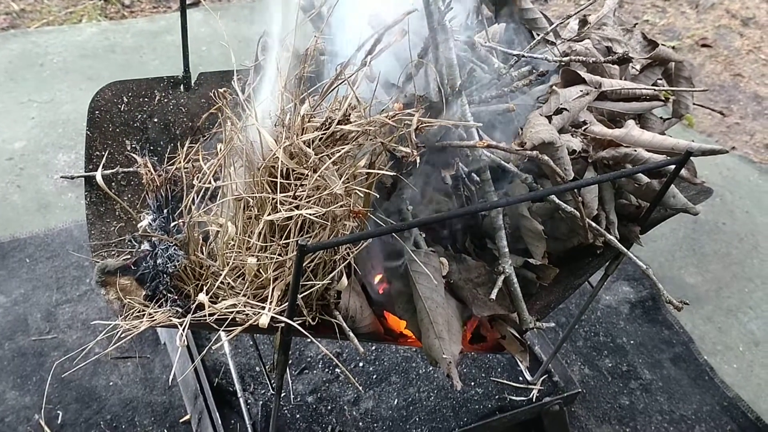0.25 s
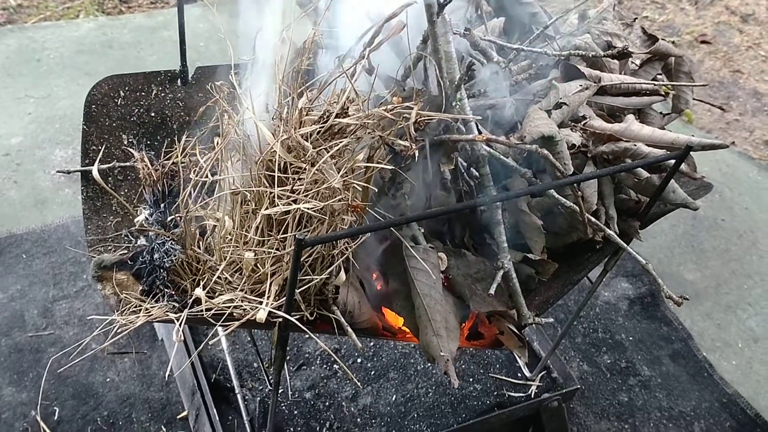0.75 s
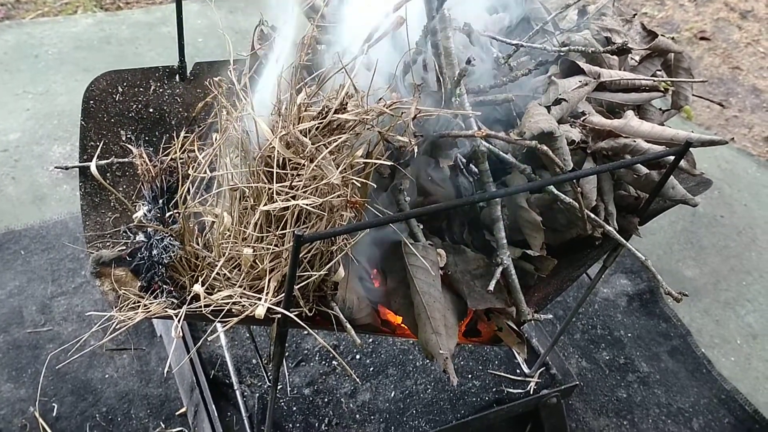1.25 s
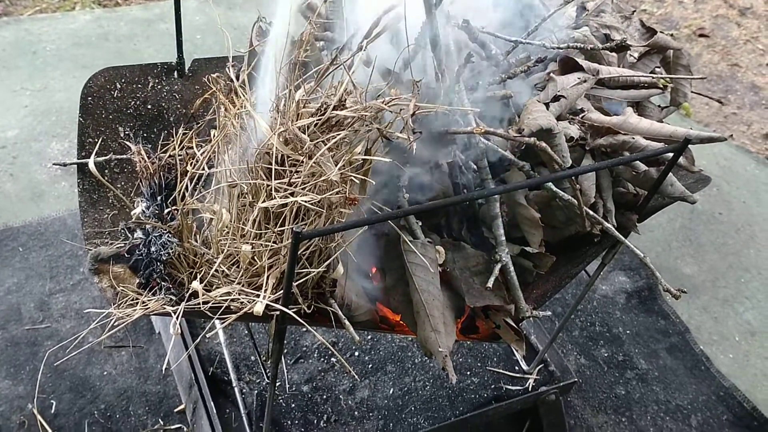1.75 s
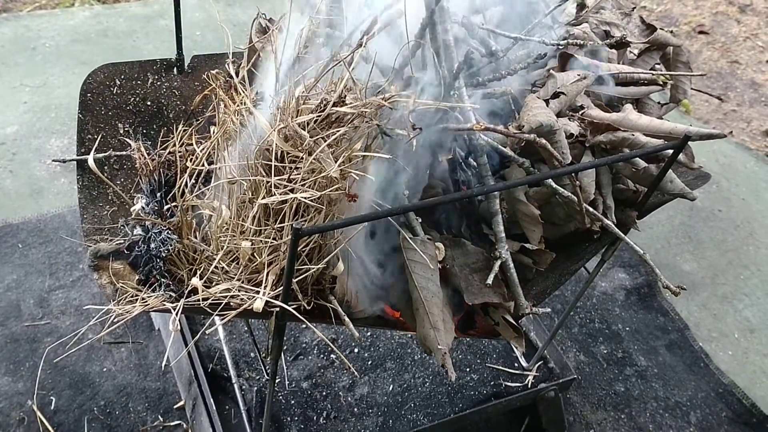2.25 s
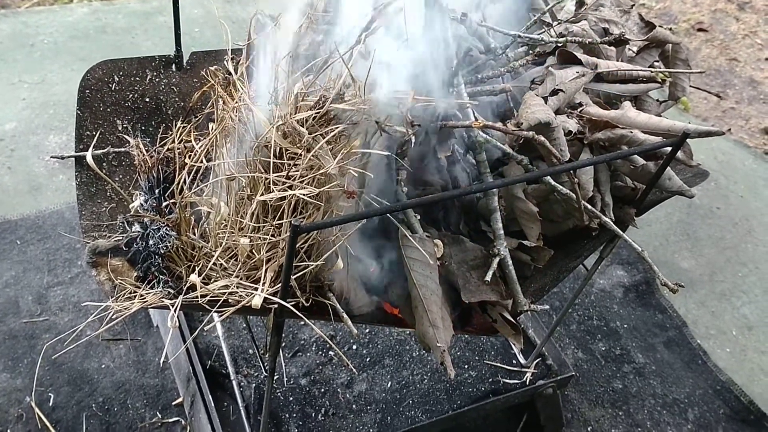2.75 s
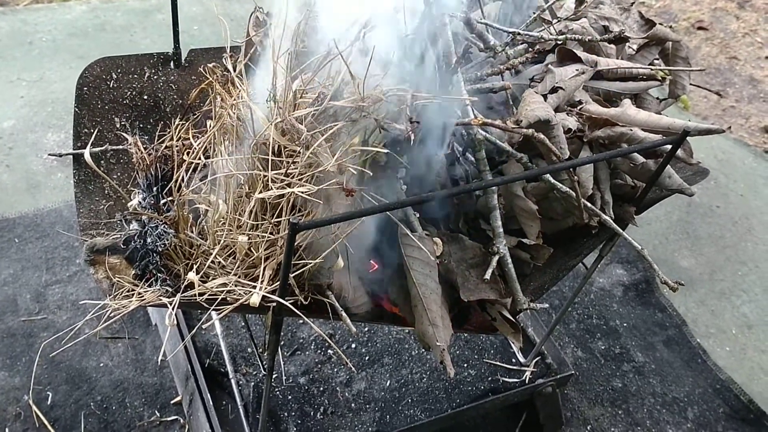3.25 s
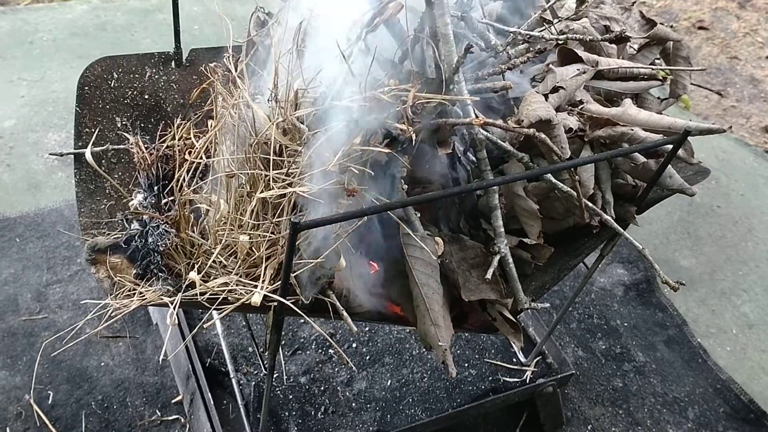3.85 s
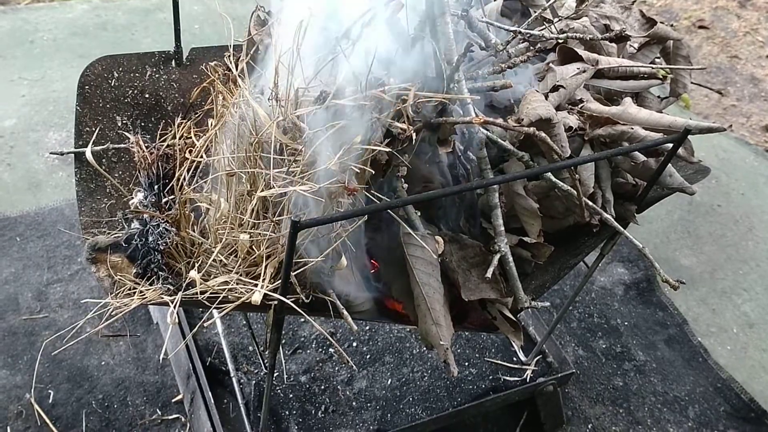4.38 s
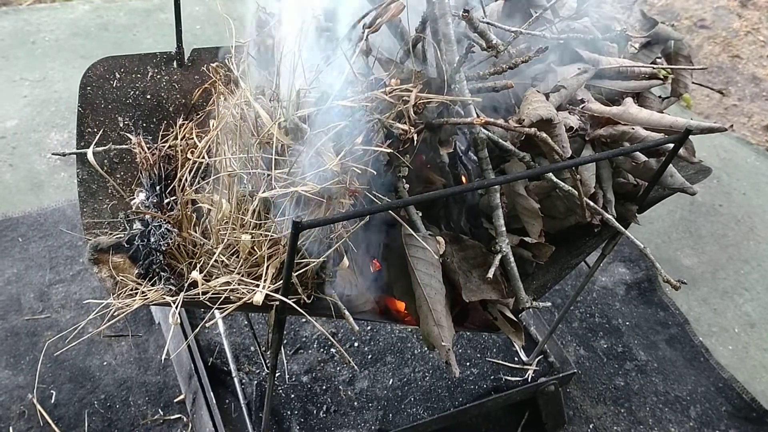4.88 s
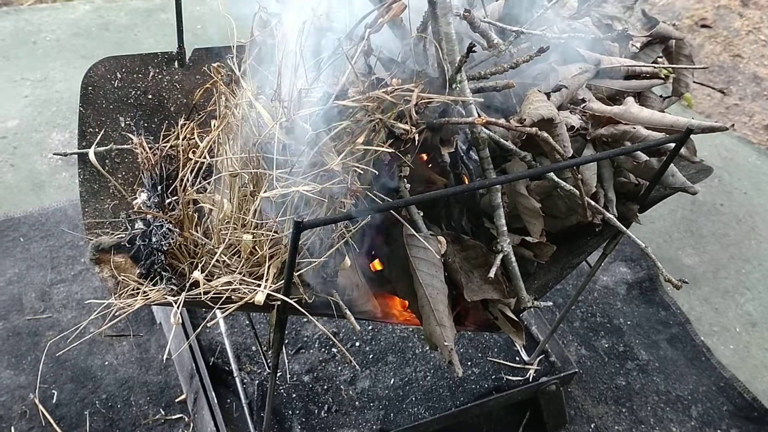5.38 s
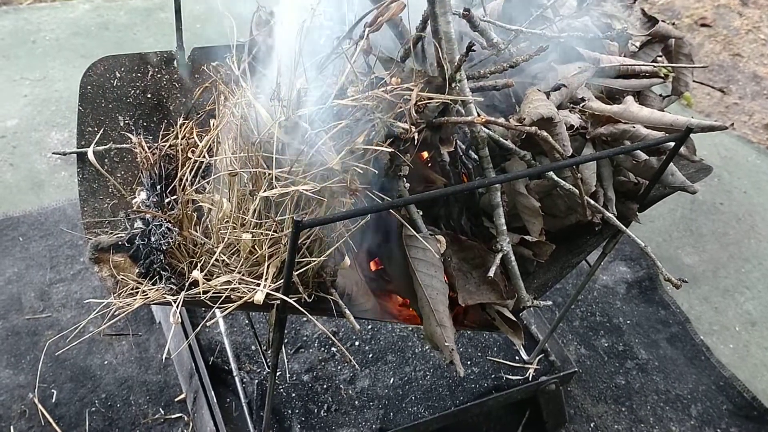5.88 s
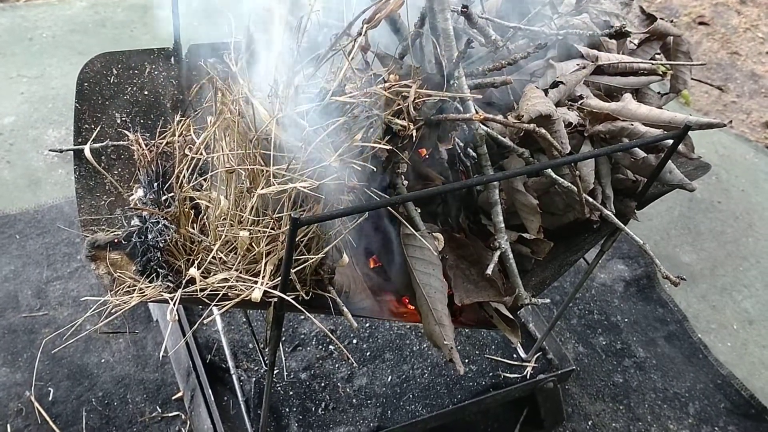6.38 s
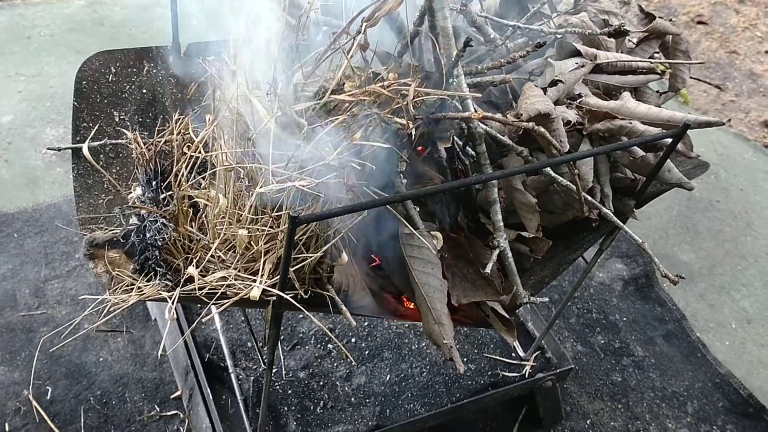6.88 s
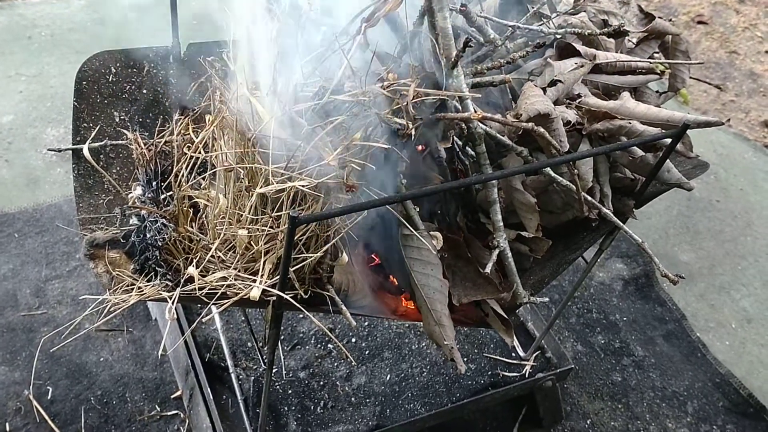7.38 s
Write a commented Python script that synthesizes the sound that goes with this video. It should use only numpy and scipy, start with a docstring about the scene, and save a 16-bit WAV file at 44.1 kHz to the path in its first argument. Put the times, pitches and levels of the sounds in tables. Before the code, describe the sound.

Small dry pops and ticks from a smouldering fire scatter over a constant shrill wash of insects, with quick chirring to the right.

```python
"""Smouldering grass among cicadas

Dry grass and twigs smoulder in a metal tray outdoors, close to a stereo pair of microphones.
Insects (shaped noise) hiss, cicadas near 8 kHz; a bush cricket (gated wing scrapes) chirps on the right,
and faint narrow tones (narrow-band noise) waver. The fire pops and ticks as damped resonances over rustling
grains; its sharpest snaps carry a 20 kHz ring that makes the right channel's limiter duck."""
import sys
import numpy as np
from scipy import signal
from scipy.fft import rfft, irfft, next_fast_len
from scipy.io import wavfile
from scipy.ndimage import uniform_filter1d, minimum_filter1d

SR = 44100
rng = np.random.default_rng(int(sys.argv[2]) if len(sys.argv) > 2 else 0)


def volts(x):
    """Linear amplitude factor 10**(x/20) for a level x in dB, scalar or array-like."""
    e = np.asarray(x, float) / 20
    return 10 ** e


def digitize_waveform(pressure):
    """Quantize a signal to 16-bit integers and store it at the path in sys.argv[1].

    Rows of a 2-D input are taken as channels; values are limited to [-1, 1].
    """
    field = np.atleast_2d(pressure).T
    bounded = np.clip(field, -1, 1)
    quanta = np.round(bounded * 32767).astype(np.int16)
    wavfile.write(sys.argv[1], SR, quanta)


N = 336483   # samples in the scene


def rms_one(x):
    """Normalization: the mean power becomes one."""
    return x / np.sqrt(np.mean(x ** 2) + 1e-20)


def sides(pan_db):
    """Intensity stereo: left and right gains that differ by pan_db, positive to the left."""
    return volts(np.array([[.5], [-.5]]) * pan_db)


def at_hz(points, hz):
    """Spectral interpolation: a curve of (Hz, value) is read on a log-frequency axis."""
    point_hz, value = np.transpose(points)
    return np.interp(np.log(hz), np.log(point_hz), value)


def resonate(x, hz, width_hz):
    """Damped resonance: a two-pole filter with gain 1 at its peak; the bandwidth sets the decay."""
    r = np.exp(-np.pi * width_hz / SR)
    zeros = [(1 - r * r) / 2, 0, (r * r - 1) / 2]
    poles = [1, -2 * r * np.cos(2 * np.pi * hz / SR), r * r]
    return signal.lfilter(zeros, poles, x + 1e-18)


def resonate_twice(x, hz, width_hz):
    """Cascaded resonance: a second pass steepens the skirts."""
    return resonate(resonate(x, hz, width_hz), hz, width_hz)


def drift(knots_per_s):
    """Random modulation: straight lines join normal draws of spread 1."""
    knots = rng.standard_normal(int(N / SR * knots_per_s) + 2)
    return np.interp(np.arange(N) / SR * knots_per_s, np.arange(len(knots)), knots)


def cycles(done, per_s, gain):
    """Phase accumulation: the running count of a rhythm whose rate climbs by gain each second."""
    t = np.arange(N) / SR
    return done + per_s * t + gain * t ** 2 / 2


def grains(per_s, spread_db):
    """Shot noise: random clicks of uneven size and sign, in two independent streams."""
    sizes = volts(spread_db * np.minimum(rng.exponential(1, (2, N)), 3))
    signs = rng.choice([-1, 1], (2, N))
    falls_here = rng.random((2, N)) < per_s / SR
    return rms_one(sizes * signs * falls_here)


def spread(source, spectrum, level_db, ripple_db):
    """Diffuse field: two unrelated sources mix into a coloured stereo bed of set correlation."""
    # Level difference across the bed. Each row: frequency in Hz, left minus right in dB.
    lean = [(60, 1.5), (300, -0.5), (500, 3.5), (800, -0.5), (1300, 2), (2100, -5.5), (3300, 2.5),
            (4500, -1), (5500, 6.5), (7000, -3.5), (8000, 0), (9100, 8), (9700, 2), (10500, -9.5),
            (13000, -4), (15500, -13)]
    # Correlation of the two sides. Each row: frequency in Hz, left-right likeness from -1 to 1.
    likeness = [(60, 0.47), (130, 0.93), (290, 0.14), (640, 0.32), (1410, 0.089), (3100, -0.016),
                (6820, 0.015), (15000, -0.075)]
    size = next_fast_len(N)
    hz = np.maximum(np.fft.rfftfreq(size, 1 / SR), 10)
    mid, side = rfft(source, size)
    alike = np.clip(at_hz(likeness, hz), -1, 1)
    pair = np.sqrt(1 + alike) * mid + np.sqrt(1 - alike) * side * [[1], [-1]]
    # Standing reflections leave fine peaks and dips, different on each side; one knot per 50 Hz.
    knots = rng.standard_normal((2, 441))
    ripple = ripple_db * np.array([np.interp(hz / 50, np.arange(441), k) for k in knots])
    colour = volts(at_hz(spectrum, hz) + ripple) * sides(at_hz(lean, hz))
    bed = irfft(pair * colour, size)[:, :N]
    return volts(level_db) * bed / np.sqrt(np.mean(bed.mean(axis=0) ** 2))


def air():
    """Broadband noise: the far hum and the embers' rustle form one steady coloured bed."""
    # Spectrum of hum and embers. Each row: frequency in Hz, relative density in dB per Hz.
    air_spectrum = [(18, -56), (30, -24), (70, -16), (150, -15), (250, -19.5), (372, -18), (753, -11.5),
                    (1720, -13), (2100, -0.5), (2420, -15.5), (2740, -8), (3350, -11.5), (3700, -13.5),
                    (4810, -50), (8140, -120)]
    return spread(rng.standard_normal((2, N)), air_spectrum, level_db=-67.5, ripple_db=2.5)


def insect_hiss(flicker_db, near_share):
    """Superposition: countless insect clicks from all around blur into a flickering hiss."""
    # Spectrum of the insect hiss: cicadas near 8 kHz, a blurred bush-cricket floor near 14 kHz.
    # Each row: frequency in Hz, relative density in dB per Hz.
    hiss_spectrum = [(2180, -69), (3700, -60), (3790, -50), (4100, -28.5), (4660, -24.5), (5390, -17.5),
                     (6160, -12.5), (7720, 2), (8610, 0), (9200, -6.5), (10900, -29.5), (13000, -21),
                     (14100, -20.5), (15100, -24), (15800, -25.5)]
    far = rng.standard_normal((2, N))
    clicks = near_share * grains(9000, spread_db=2.5) + far
    flicker = volts(flicker_db * np.array([drift(25), drift(25)]))
    return spread(clicks, hiss_spectrum, level_db=-33.5, ripple_db=3.5) * flicker


def narrow_tones(waver_db):
    """Narrow-band noise: a soft tonal hiss near 2.1 kHz and whistles above 5 kHz, all wavering."""
    # Faint narrow tones, unlike on the two sides. Each row: frequency in Hz, bandwidth in Hz,
    # level in dB before wavering, start in seconds, end in seconds, left minus right in dB.
    tone_rows = [(2110, 170, -69, 0, 7.63, -2.5), (5583, 45, -61, 0, 7.63, 1.5), (5958, 60, -52, 0, .42, 3),
                 (5960, 70, -57, 5.6, 6.6, -3), (6465, 60, -51.5, 5.1, 6.65, -1.5),
                 (7692, 40, -50, 0, 7.63, 1.5), (8330, 50, -51, 0, 7.63, -1.5),
                 (8431, 30, -51.5, 0, 7.63, 1.5)]
    out = np.zeros((2, N))
    t = np.arange(N) / SR
    for hz, width_hz, level_db, start_s, end_s, pan_db in tone_rows:
        tone = rms_one(resonate_twice(rng.standard_normal((2, N)), hz, width_hz))
        gate = np.clip(np.minimum(t - start_s + .05, end_s - t + .05) / .1, 0, 1)
        out += tone * gate * volts(level_db + waver_db * drift(4.1)) * sides(pan_db)
    return out


def through_leaves(song):
    """Multiple scattering: decaying noise responses smear the strokes, most of all on the left."""
    leaves = rng.standard_normal((2, 900)) * np.exp(-np.arange(900) / SR / .003)
    leaves = leaves / np.sqrt(np.sum(leaves ** 2, axis=1, keepdims=True))
    wet = signal.fftconvolve(song[None], leaves, axes=1)[:, :N]
    left = .5 * np.roll(song, 6) + wet[0]   # the direct sound comes 6 samples later on the left
    right = song + .4 * wet[1]
    return rms_one(np.array([rms_one(left), rms_one(right)]))


def bush_cricket(stops, fade_db, scrape_s, rough, second_db):
    """Stridulation: regular scrapes with weaker returns drive wing resonances, gated into chirps."""
    # The wing rings higher as a chirp goes on. Each row: resonance in Hz, bandwidth in Hz,
    # level in dB relative to the other bands, entry as a share of the chirp period.
    wing = [(13400, 800, -7, .66), (13850, 450, -2.5, .67), (14400, 800, -1, .71), (14900, 800, 0, .75),
            (15350, 800, -2, .8), (15750, 600, -4, .83)]
    chirps = cycles(done=.77, per_s=12.45, gain=.073)
    strokes = cycles(done=.5, per_s=186.51, gain=.09)
    strength = volts(1.7 * drift(190))
    since_s = ((strokes + 0.11) % 1) / 187   # time since the stroke began
    first = np.exp(-since_s / scrape_s)
    second = volts(second_db) * (since_s > .0014) * np.exp(-np.abs(since_s - .0014) / scrape_s)
    teeth = rng.standard_normal(300)[(since_s * SR).astype(int)]   # the same file on every stroke
    scrape = strength * (first + second) * (teeth + rough * rng.standard_normal(N))
    song = np.zeros(N)
    for hz, width_hz, level_db, enters in wing:
        phase = (chirps - enters) % 1
        length = 1 + stops - enters
        fade = volts(-fade_db * np.maximum(phase - length, 0))   # dies away in the leaves
        gate = np.clip(phase * 20, 0, 1) * fade
        song += volts(level_db) * rms_one(resonate_twice(scrape * gate, hz, width_hz))
    return volts(-50) * through_leaves(song) * sides(-11.5)


def vigour_curve():
    """Common modulation: one slow curve in dB drives both the tick rate and the rustle."""
    # Vigour of the fire. Each row: time in seconds, vigour in dB.
    vigour_rows = [(0, -2), (.7, 0), (1.3, 5), (1.9, 2), (2.5, 5), (3, -1), (4, -5), (5, -3), (7.63, -3)]
    s, vigour_db = np.transpose(vigour_rows)
    return np.interp(np.arange(N) / SR, s, vigour_db)


def rustle(hz, width_hz, clump_db, pan_db):
    """Filtered shot noise: dense tiny cracks in the grass swell in clumps."""
    shared, own = grains(1500, spread_db=3.0), grains(1500, spread_db=3.0)
    body = resonate_twice(shared[0] + 0.44 * own, hz, width_hz)
    level_db = -70 + vigour_curve() + clump_db * drift(30)
    return rms_one(body) * volts(level_db) * sides(pan_db)


def echoed(x):
    """Early reflection: tray and ground add delayed copies whose signs alternate."""
    # Each row: delay on the left in seconds, delay on the right in seconds, level in dB.
    echo_rows = [(.0007, .0005, -49), (.0023, 0.0016, -25), (.0041, .0044, -13), (.0072, .0061, -28),
                 (.012, 0.012, -28)]
    out = x.copy()
    for k, (left_s, right_s, level_db) in enumerate(echo_rows):
        for side, delay_s in enumerate([left_s, right_s]):
            lag = round(delay_s * SR)
            out[side, lag:] -= (-1) ** k * volts(level_db) * x[side, :N - lag]
    return out


def pop(hz, mid_db, top_db, width_hz, crack_s, top_pan_db):
    """Impulse excitation: a steam pocket bursts as a damped knock under a noisy, right-leaning crack."""
    n = np.arange(400)
    click = (n == 0) + 0.13 * rng.standard_normal(400) * np.exp(-n / SR / 0.0014)
    knock = resonate(click, hz, width_hz)
    woody = signal.butter(3, [500, 2700], "band", fs=SR, output="sos")   # keeps it small and woody
    knock = signal.sosfilt(woody, knock)
    crack = 0.72 * (n == 0) + rng.standard_normal((2, 400)) * np.exp(-n / SR / crack_s)
    mid = resonate(resonate(crack, 5400, 6300), 5600, 5100)
    top = resonate(resonate(crack, 13300, 8000), 12900, 7200)
    knock = knock / np.abs(knock).max()
    mid = volts(mid_db) * mid / np.abs(mid).max()
    top = volts(top_db) * sides(top_pan_db) * top / np.abs(top).max()
    return knock + mid + top


def fire(tick_db, tick_spread_db):
    """Poisson process: small ticks fall by chance among listed pops, slightly later on the right."""
    # Loud pops. Each row: start in seconds, knock peak in dB before panning and echoes, knock in Hz,
    # middle crack in dB over the knock, top crack in dB over the knock before its own panning.
    pop_rows = [(.308, -40, 1850, 0, 8), (.343, -44.5, 2160, 19, 9), (.414, -33, 1820, -6, 12),
                (.465, -41.5, 1690, 1, 6), (.647, -43, 2100, 10, 17), (.664, -39, 1720, 4, 8),
                (.779, -36, 2000, -2, 4), (.81, -38, 1570, 13.5, 5), (.9135, -25.5, 1680, 8, 3),
                (1.036, -37.5, 1580, 11, 7), (1.095, -33, 2000, -5, 2), (1.161, -33.5, 1920, 3, 9),
                (1.171, -36, 2000, -2, 5), (1.237, -44, 1540, -2, 8), (1.244, -44, 1300, -4, 4),
                (1.35, -32, 1800, -3, 10), (1.445, -42, 1960, 0, 6), (1.465, -41.5, 1940, 5, 11),
                (1.489, -36.5, 1990, 9, 15), (1.513, -31, 1880, -3, 6), (1.538, -32, 1720, 2, 12),
                (1.696, -29.5, 1780, -17, 3), (1.8381, -24.5, 1680, -4, 10), (2.069, -39, 1620, 18, 11),
                (2.173, -30.5, 1870, -8, 1), (2.3803, -27.5, 1500, 17, 17.5), (2.465, -30, 1510, 0, -1),
                (2.513, -26.5, 1970, 11, 16), (2.649, -35.5, 1580, 10, 19), (2.722, -30, 1610, 0, -2),
                (2.773, -18.5, 1690, 14, 13.5), (2.805, -39, 1810, 7, 17), (2.826, -33.5, 1460, -4, 1),
                (2.861, -41.5, 1950, 16, 3), (3.124, -38, 1960, 9, 15), (3.228, -47, 2110, 4, 11),
                (3.596, -41, 1340, -1, 8), (3.666, -33.5, 1840, 8, 11), (3.804, -40, 2030, 8, 7),
                (3.917, -29.5, 1900, 4, 11), (4.181, -24, 1930, 6, 3), (4.558, -37, 1750, -1, 10),
                (4.6, -28.5, 1840, -3, 11), (4.815, -45.5, 2070, 0, 12), (4.976, -43.5, 1850, 4, 12),
                (5.182, -44.5, 1970, 0, 10), (5.393, -32, 1930, 2, 15), (5.461, -34, 1850, 7.5, 12),
                (5.91, -44.5, 2090, 5, 13), (5.994, -38.5, 1800, 5, 16), (6.442, -40, 1850, 5, 10),
                (6.78, -32, 1900, 22, 19), (6.956, -37.5, 2020, -2, 6), (7.2, -35.5, 2040, 12, 20)]
    ticks_per_s = 65 * volts(1.2 * vigour_curve())   # 65 per second at 0 dB vigour
    ticks = []
    for i in np.flatnonzero(rng.random(N) < ticks_per_s / SR):
        peak_db = tick_db + tick_spread_db * min(rng.exponential(), 3)
        ticks.append((i / SR, peak_db, rng.uniform(1010, 2260), 3.5, 5.5))
    out = np.zeros((2, N + 800))
    for s, peak_db, hz, mid_db, top_db in pop_rows + ticks:
        pan_db = -4 + 1.6 * rng.standard_normal()   # the tray lies to the right; pops scatter across it
        burst = pop(hz, mid_db, top_db, width_hz=810, crack_s=0.00036, top_pan_db=-5)
        burst = volts(peak_db) * sides(pan_db) * burst
        i = round(s * SR)
        out[0, i:i + 400] += burst[0]
        out[1, i + 3:i + 403] += burst[1]
    return echoed(out[:, :N])


def snaps(crack_db):
    """Ultrasonic ringing: the right microphone's top resonance rings at 20 kHz beside a bright crack."""
    # Sharpest snaps. Each row: time in seconds, peak of the ring in dB.
    snap_rows = [(.914, -3), (2.38, -8), (2.513, 5), (2.773, 0), (4.181, -8), (6.781, 2)]
    out = np.zeros((2, N))
    n = np.arange(200)
    ring = np.hanning(200) * np.sin(2 * np.pi * 20000 * n / SR)
    for s, peak_db in snap_rows:
        burst = rng.standard_normal(200) * (n > 95) * np.exp((95 - n) / SR / 0.00046)
        crack = resonate(burst, 18300, 10400)
        snap = ring + volts(crack_db) * crack / np.abs(crack).max()
        middle = round(s * SR)
        out[1, middle - 100:middle + 100] = volts(peak_db) * snap
    return out


def scene():
    """Linear superposition: the pressures of all sources add at the microphones."""
    background = air() + insect_hiss(flicker_db=0.63, near_share=0.71) + narrow_tones(waver_db=2.0)
    cricket = bush_cricket(stops=.22, fade_db=110, scrape_s=.00035, rough=.6, second_db=-5)
    grass = rustle(hz=1500, width_hz=1680, clump_db=5.0, pan_db=-3.0)
    pops = fire(tick_db=-62.5, tick_spread_db=4.0)
    return background + cricket + grass + pops + snaps(crack_db=-3.5)


def limiter(x, ceiling_db, ahead_s, hold_s, release_s):
    """Look-ahead gain control: each channel ducks ahead of a peak, holds, then recovers."""
    over_db = np.maximum(20 * np.log10(np.abs(x) + 1e-9) - ceiling_db, 0)
    span = round((ahead_s + hold_s) * SR)
    origin = span // 2 - round(ahead_s * SR) - 1
    held_db = -minimum_filter1d(-over_db, size=span, axis=1, origin=origin)
    # The excess decays exponentially: a running maximum of its logarithm plus the fall so far.
    fall = np.arange(N) / SR / release_s
    duck_db = np.exp(np.maximum.accumulate(np.log(held_db + 1e-9) + fall, axis=1) - fall)
    return x * volts(-uniform_filter1d(duck_db, size=40, axis=1))


def top_cut(x):
    """Nothing passes above the cut-off."""
    return signal.sosfilt(signal.butter(12, 16920, fs=SR, output="sos"), x)


def record(dry):
    """Band limitation: the limiter acts on the full band, then a steep low-pass cuts the top."""
    limited = limiter(dry, ceiling_db=-5.5, ahead_s=0.0092, hold_s=0.069, release_s=0.099)
    low_pass = signal.cheby2(16, 60, 16150, fs=SR, output="sos")
    mix = signal.sosfilt(low_pass, limited)
    return top_cut(mix)


dry = scene()
out = record(dry)
digitize_waveform(out)
```